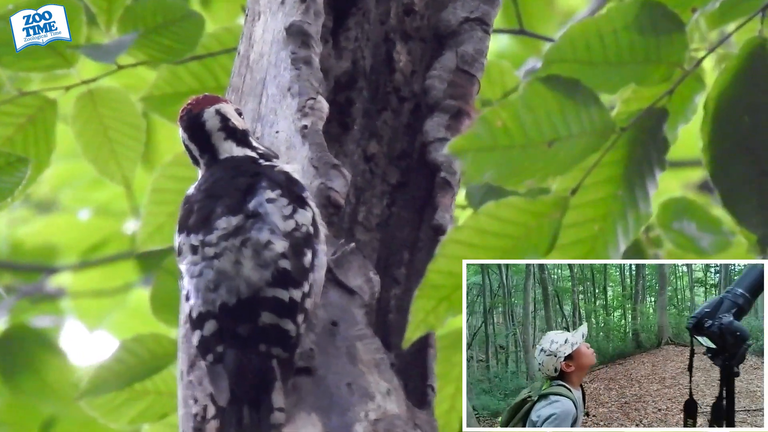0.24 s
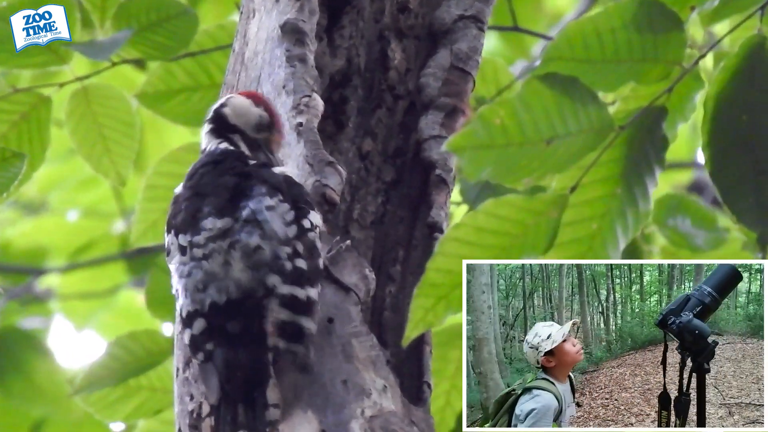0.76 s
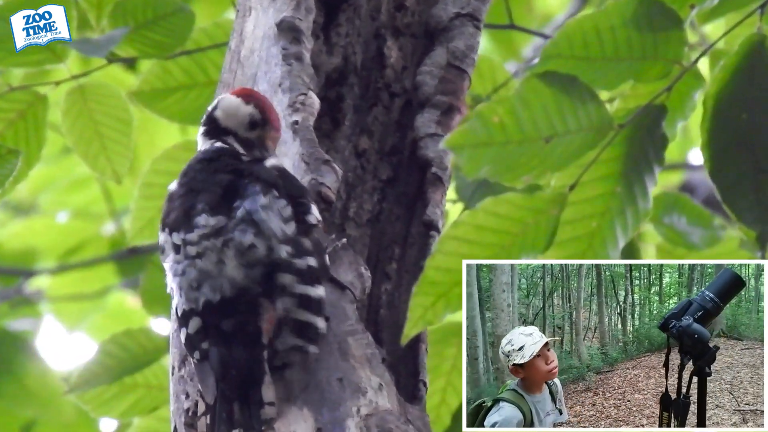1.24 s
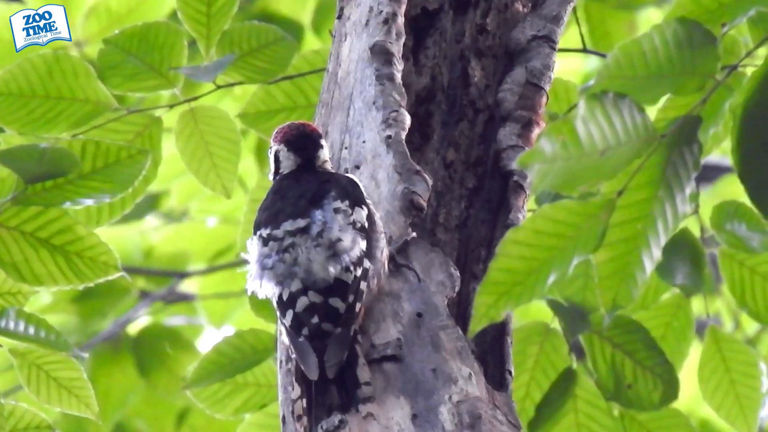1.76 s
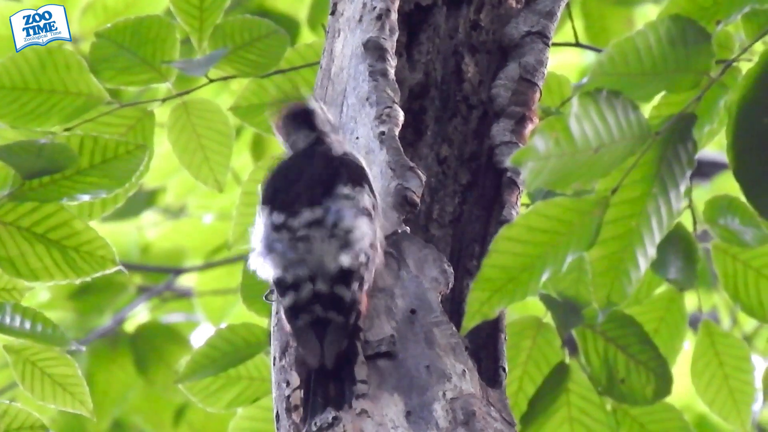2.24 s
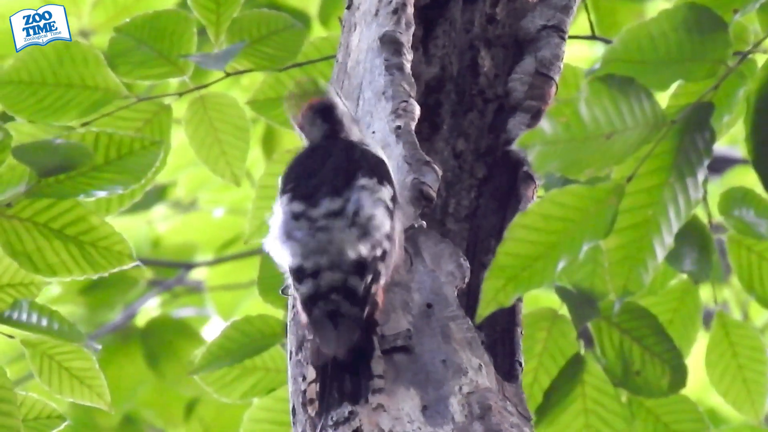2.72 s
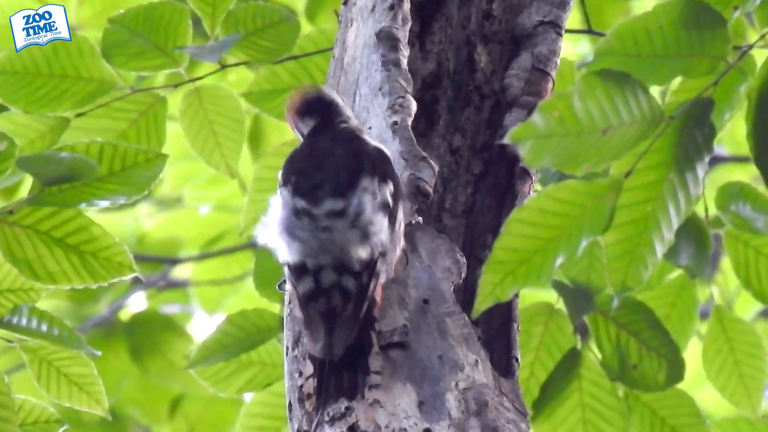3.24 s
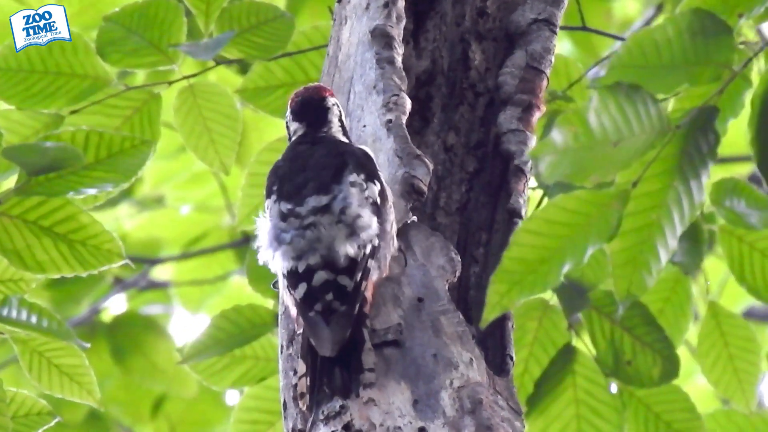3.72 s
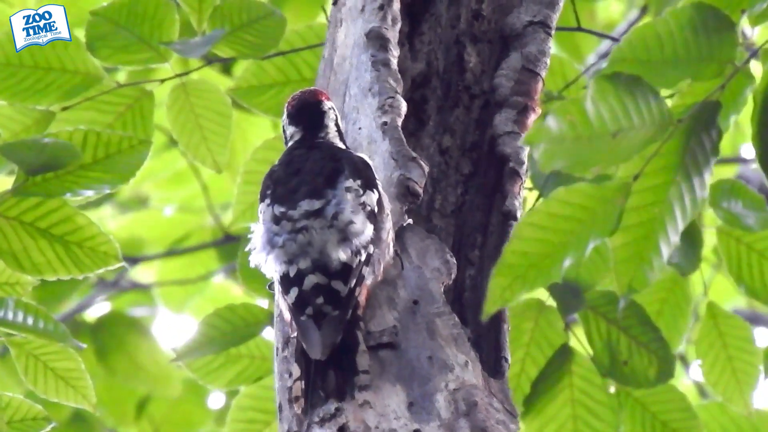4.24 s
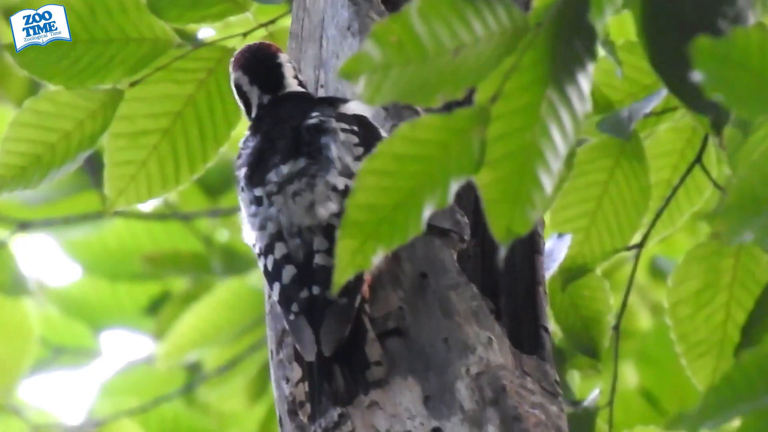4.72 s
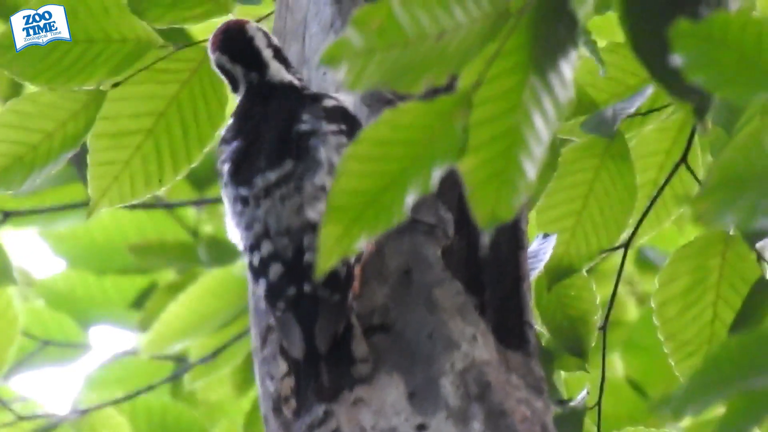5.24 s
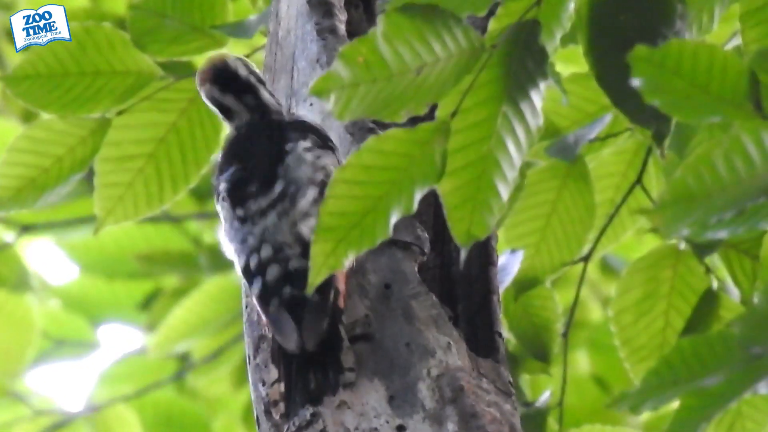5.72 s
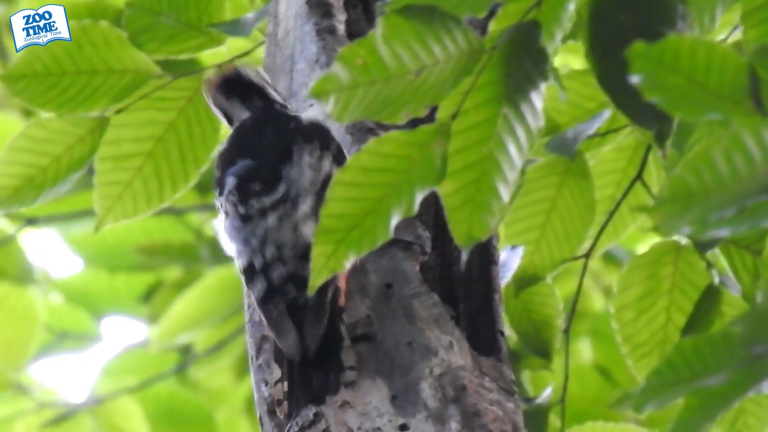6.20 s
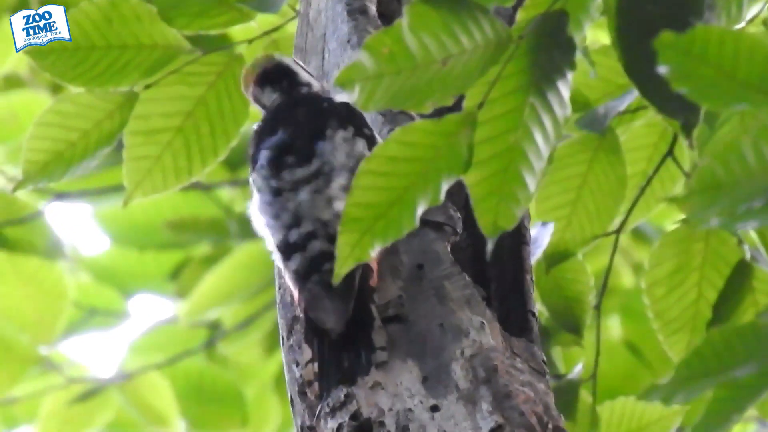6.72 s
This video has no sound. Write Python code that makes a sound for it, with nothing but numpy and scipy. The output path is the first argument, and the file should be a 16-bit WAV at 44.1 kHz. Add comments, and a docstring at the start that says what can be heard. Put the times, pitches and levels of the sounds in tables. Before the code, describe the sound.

A woodpecker drums two accelerating rolls on a dead trunk over a loud, high cicada chorus in a summer forest.

```python
"""A summer forest, in stereo. A woodpecker drums two rolls on a dead trunk: its bill rings the wood,
and each roll speeds up and fades among the trees. Three shots are cut together: a quiet one with distant
cicadas and light wind on the microphone, then two with a loud chorus, each opening on one near cicada
clicking its ribs into a buzz. Dull bumps, scuffs and ticks sound close to the microphone; a thin insect
whine and one falling whistle come from far off."""
import sys
import numpy as np
from scipy import signal
from scipy.fft import rfft, irfft, next_fast_len
from scipy.io import wavfile
from scipy.ndimage import map_coordinates

SR = 44100
rng = np.random.default_rng(int(sys.argv[2]) if len(sys.argv) > 2 else 0)


def unload_wav(signal):
    """Save mono or channel-first audio to the path in sys.argv[1] as 16-bit WAV at rate SR, clipped to [-1, 1]."""
    wavfile.write(
        sys.argv[1],
        SR,
        np.round(np.clip(np.atleast_2d(signal).T, -1, 1) * 32767).astype(np.int16),
    )


N = 306803
TIME_S = np.arange(N) / SR


def woodpecker(roll, level_db, fade_db, fade_power, scatter_db, soft_hz=1700, soft_db=-11):
    """One drum roll: the bill hits the same spot again and again, and weak blows are duller."""
    hard, soft = np.zeros((2, N))
    for start_s, db in strikes(roll, fade_db, fade_power):
        softness = min(1, amp(soft_db - db))
        hard[round(start_s * SR)] = amp(db) * (1 - softness)
        soft[round(start_s * SR)] = amp(db) * softness
    force = hard + filtered(soft, lambda hz: lowpass(hz, soft_hz, power=4))
    wood = amp(level_db) * signal.fftconvolve(force, trunk_knock(spot=roll))[:N]
    return trunk_to_microphone(wood, scatter_db)


# The two rolls: start_s, first_gap_s, shortening_per_gap_s, strike_count
ROLL_TIMING = [(2.0526, .0978, .002517, 25), (5.3847, .09866, .002453, 22)]

def strikes(roll, fade_db, fade_power, fastest_gap_s=.0501):
    """Time and level of each blow: gaps shrink towards the neck's limit, blows weaken ever faster."""
    start_s, first_gap_s, shortening_s, count = ROLL_TIMING[roll]
    k = np.arange(count)
    gaps = np.maximum(first_gap_s - shortening_s * k, fastest_gap_s)
    db = -fade_db * (k / k[-1]) ** fade_power
    db += rng.standard_normal(count)  # no two blows are quite alike
    db[0] -= 2.5  # a lighter opening blow
    return zip(start_s + np.cumsum(gaps) - gaps, db)


# Colour of a blow on the two drumming spots: frequency_hz, upper_spot_db, lower_spot_db
KNOCK_SPECTRA = [(61, -60.5, -66.5), (166, -15.5, -17), (297, -18, -15.5), (412, -5.5, -7),
                 (985, -2.5, -2.5), (1210, -4.5, -3.5), (1710, -3.5, 1.5), (2160, -7.5, -7),
                 (2400, -16.5, -12), (3600, -14.5, -19), (5900, -46, -55), (11700, -90.5, -85)]
# Resonances of the dead trunk, with one dip among them: centre_hz, width_hz, lift_db
TRUNK_RESONANCES = [(200, 64, 6), (346, 23, 17), (516, 35.5, 8.5), (668, 86, -2.5), (790.6, 45, 9.5),
                    (869, 46, 5), (1099, 77, 9.5), (1466, 270, 4), (1643, 160, 3.5), (1787, 52, 3.5),
                    (2310, 76, 5), (2800, 36, 7.5)]

def trunk_knock(spot, contact_hz=2300):
    """One strike of the bill: a short knock that rings the trunk, peak 1."""
    hz = np.fft.rfftfreq(SR // 2, 1 / SR)
    colour = amp(along(np.asarray(KNOCK_SPECTRA)[:, [0, spot + 1]], hz))
    contact = lowpass(hz, contact_hz, power=4)  # a smooth, brief contact rounds the knock
    delay = np.exp(-2j * np.pi * hz * .002)  # 2 ms, so its rise fits in the buffer
    response = contact * delay * minimum_phase(colour / contact)
    for centre, width, db in TRUNK_RESONANCES:
        resonance = 1j * hz * width / (centre ** 2 - hz ** 2 + 1j * hz * width)
        response *= 1 + (amp(db) - 1) * resonance
    wave = irfft(response)
    return -wave / np.abs(wave).max()


# Down the trunk, straight, off the ground, off a neighbouring tree: delay_s, level_db, cutoff_hz
KNOCK_PATHS = [(-.0033, -15.5, 1125), (0, -1, 3460), (.0063, -12, 4000), (.0145, -8.5, 825)]

def trunk_to_microphone(wood, scatter_db, deep_db=-9, side_db=-15.5):
    """Knocks arrive by four paths, with scatter off the trees and a faint echo from deeper woods."""
    def paths(hz):
        return sum(amp(db) * np.exp(-2j * np.pi * hz * delay_s) * lowpass(hz, cutoff_hz)
                   for delay_s, db, cutoff_hz in KNOCK_PATHS)
    tail = amp(scatter_db) * forest_tail(stretch=0.59) + amp(deep_db) * forest_tail(stretch=4.4)
    tail_s = np.arange(tail.shape[1]) / SR
    tail *= 1 - np.exp(-(tail_s / 0.0034) ** 2)  # scatter builds over the first milliseconds
    mid, side = signal.fftconvolve(wood[None], tail, axes=1)[:, :N]
    return filtered(wood, paths) + mid + amp(side_db) * np.array([side, -side])


# Scatter among the trunks, before stretching: frequency_hz, t60_s
FOREST_DECAY = [(200, 0.14), (500, 0.35), (1500, 0.15), (3000, 0.57), (7000, 0.19)]

def forest_tail(stretch):
    """Two unrelated tails of sound scattered by trees, each of energy about 1."""
    hz, t, noise = signal.stft(rng.standard_normal((2, SR)), SR, nperseg=256)
    t60_s = stretch * along(FOREST_DECAY, hz)[:, None]
    tail = signal.istft(noise * amp(-60 * t / t60_s), SR, nperseg=256)[1]
    return tail / np.linalg.norm(tail[0])


# Each near cicada sings a loud phrase, then a soft one: start_s, end_s, level_db, attack_s, release_s
FIRST_CICADA_PHRASES = [(1.62, 1.75, -23, 0.0036, 0.047), (1.75, 2.4, -29, .05, 0.33)]
SECOND_CICADA_PHRASES = [(4.66, 5.31, -14.5, 0.0074, 0.13), (5.55, 6.7, -26, 0.22, 0.24)]
# Their colour at the microphone: frequency_hz, level_db
FIRST_CICADA_SPECTRUM = [(4500, -53), (5200, -6), (5500, -0.5), (5800, 4), (6400, 0), (7000, 15.5),
                         (7700, -31), (10000, -54)]
SECOND_CICADA_SPECTRUM = [(4200, -59), (5100, -37), (5450, -21), (5680, -17), (5950, -8), (6350, 1),
                          (7050, 0), (7600, -6.5), (8300, -13), (10000, -57.5)]

def near_cicadas():
    """One cicada buzzes near the microphone in each loud shot; the second flutters slightly."""
    first = spread(tymbal(click_hz=582, jitter=.022), FIRST_CICADA_SPECTRUM)
    second = spread(tymbal(click_hz=540, jitter=.022), SECOND_CICADA_SPECTRUM)
    first *= phrases(FIRST_CICADA_PHRASES)
    second *= phrases(SECOND_CICADA_PHRASES) * amp(0.56 * wobble(30))
    return shot(1) * first + shot(2) * second


def tymbal(click_hz, jitter):
    """A cicada's ribs click at a slightly unsteady rate; the leaves smear the clicks."""
    cycles = np.cumsum(click_hz * (1 + jitter * wobble(180) + .003 * wobble(4))) / SR
    position = np.interp(np.arange(1, int(cycles[-1])), cycles, np.arange(N))
    sample, fraction = position.astype(int), position % 1
    size = amp(2 * rng.standard_normal(len(position)))
    clicks = np.bincount(sample, size * (1 - fraction), N + 1)
    clicks += np.bincount(sample + 1, size * fraction, N + 1)
    bright = filtered(clicks[:N], lambda hz: hz > 4500)  # so small a body radiates nothing low
    return irfft(rfft(bright, N) * rfft(forest_tail(stretch=0.36), N), N)


# The chorus far off, at middle distance and nearby: frequency_hz, level_db
FAR_CHORUS_SPECTRUM = [(2820, -56), (4800, -78), (5450, -7), (5990, -11.5), (6260, 0.5), (6780, -5.5),
                       (7350, -2), (8070, 7.5), (9110, 2.5), (9970, -3), (10700, -11.5), (13900, -76),
                       (22000, -120)]
MID_CHORUS_SPECTRUM = [(2710, -30.5), (4600, -31), (5080, -29.5), (6500, -6.5), (7840, 0.5), (8390, -2.5),
                       (8840, -7), (10700, -40.5), (13900, -97), (22000, -120)]
NEAR_CHORUS_SPECTRUM = [(2710, -20.5), (4600, -23.5), (5370, -26.5), (6210, -4.5), (6620, 1.5), (7380, 3.5),
                        (9130, -8.5), (10400, -28), (10700, -50), (13900, -61), (22000, -120)]

def cicadas(loud_top_hz=10858):
    """A steady chorus in each shot, with the two near singers on top."""
    far = shot(0) * chorus(FAR_CHORUS_SPECTRUM, level_db=-43.5, leader_db=-1, click_hz=582)
    mid = shot(1) * chorus(MID_CHORUS_SPECTRUM, level_db=-21, leader_db=-6.5, click_hz=505)
    near = shot(2) * chorus(NEAR_CHORUS_SPECTRUM, level_db=-19.5, leader_db=0, click_hz=474)
    return far + filtered(mid + near + near_cicadas(), lambda hz: hz < loud_top_hz)


def chorus(spectrum, level_db, leader_db, click_hz):
    """Countless cicadas merge into a hiss, with one leader standing a little out of it."""
    voices = rng.standard_normal((2, N)) + amp(leader_db) * unit(tymbal(click_hz, jitter=.016))
    return amp(level_db + 0.48 * wobble(4) + 0.16 * wobble(25)) * spread(voices, spectrum)


# Dull bumps: peak_s, pitch_hz, level_db, half_width_s
DULL_BUMPS = [(4.206, 215, -38, 0.019), (5.278, 200, -28.5, 0.016), (5.329, 196, -17, 0.012),
              (5.365, 184, -31.5, 0.027), (5.701, 170, -16.5, 0.0057), (5.728, 171, -34, 0.011)]
# Small taps and leaf ticks: peak_s, centre_hz, level_db, half_width_s
LEAF_TICKS = [(0.263, 900, -54, .005), (0.333, 1030, -50, 0.0037), (0.638, 520, -47, 0.0023),
              (1.092, 470, -46.5, .005), (1.133, 845, -51.5, 0.0034), (2.307, 4800, -33, 0.011),
              (5.468, 4470, -33.5, 0.0062), (5.704, 2560, -26.5, 0.0081), (5.721, 4800, -27, .006)]
# Soft scuffs leading into the second roll: peak_s, level_db, half_width_s
SOFT_SCUFFS = [(4.83, -41.5, 0.034), (5.075, -39, 0.02), (5.274, -31.5, 0.0065), (5.315, -37, 0.014),
               (5.387, -31, 0.062)]
# Their colour: frequency_hz, level_db
SCUFF_SPECTRUM = [(100, -24), (400, -26), (600, 7), (750, -3), (870, 8), (1000, 4), (1500, -15),
                  (4000, -8.5), (9000, -57)]

def close_noises():
    """Low bumps, small ticks and soft scuffs close to the microphone."""
    bumps = sum(amp(db) * swell(s, width) * np.sin(2 * np.pi * hz * (TIME_S - s))
                for s, hz, db, width in DULL_BUMPS)
    ticks = sum(amp(db) * swell(s, width) * noise_band(hz) for s, hz, db, width in LEAF_TICKS)
    scuff_gain = sum(amp(db) * swell(s, width) for s, db, width in SOFT_SCUFFS)
    return bumps + ticks + scuff_gain * stereo_noise(SCUFF_SPECTRUM)


# The distant insect's song: start_s, end_s, level_db, attack_s, release_s
INSECT_PHRASES = [(0, .38, -51.5, 0.007, 0.21), (1.63, 2.25, -36.5, 0.37, 1.5), (5.15, 5.35, -46, .1, .6)]
# Its note in each shot: pitch_hz
INSECT_PITCHES = [4050, 4175, 4220]

def distant_insect(octave_db=-6, flutter_db=2):
    """A thin whine that pulses unevenly, with a weaker partial an octave below."""
    pitch_hz = sum(hz * shot(k) for k, hz in enumerate(INSECT_PITCHES))
    whine = far_tone(pitch_hz, blur_hz=81) + amp(octave_db) * far_tone(pitch_hz / 2, blur_hz=70)
    return whine * phrases(INSECT_PHRASES) * amp(flutter_db * wobble(14))


def distant_whistle(peak_s=2.7, level_db=-39, pitch_hz=3940, fall_hz_per_s=1000):
    """One faint whistle swells and falls in pitch, far from the microphone."""
    glide_hz = pitch_hz - fall_hz_per_s * (TIME_S - peak_s)
    return amp(level_db) * swell(peak_s, half_width_s=0.22) * far_tone(glide_hz, blur_hz=200)


def far_tone(pitch_hz, blur_hz):
    """A far tone, blurred by its many paths through the trees."""
    phase = 2 * np.pi * np.cumsum(pitch_hz) / SR
    blur = filtered(rng.standard_normal((2, 2, N)), lambda hz: lowpass(hz, blur_hz))
    return unit(blur[0] * np.cos(phase) + blur[1] * np.sin(phase))


# Wind rumble on the microphone: frequency_hz, level_db
WIND_SPECTRUM = [(15, -14), (30, 5.5), (55, 1), (100, -2), (160, -15), (260, -23.5), (600, -68)]

def microphone_wind(breeze_db=-47, fall_db_per_s=4, puff_db=-41.5):
    """Light wind buffets the microphone in the first shot, easing off but for one stronger puff."""
    breeze = amp(breeze_db - fall_db_per_s * TIME_S)
    puff = amp(puff_db) * swell(peak_s=1.33, half_width_s=0.061)
    return shot(0) * (breeze + puff) * amp(1.3 * wobble(8.9)) * stereo_noise(WIND_SPECTRUM)


# Hush of the quiet shot and forest air of the loud ones: frequency_hz, level_db
HUSH_SPECTRUM = [(80, -5), (170, -1.5), (320, -6), (550, -15.5), (1500, -18), (2100, -15.5), (3000, -22.5),
                 (5000, -21), (12000, -24.5), (15500, -25)]
AIR_SPECTRUM = [(25, -10.5), (60, 4), (130, 3.5), (220, -2.5), (350, -13), (700, -11), (1500, -19.5),
                (3000, -19.5), (5000, -11), (9000, -22), (11000, -95)]
# The background in each shot: opening_level_db, fall_db_per_s
AIR_LEVELS = [(-47.5, 6), (-44, 0.4), (-38, 2.2)]

def forest_air():
    """The soft noise of the forest all round, easing off through each shot."""
    gain = sum(shot(k) * amp(db - fall * (TIME_S - SHOT_EDGES[k]))
               for k, (db, fall) in enumerate(AIR_LEVELS))
    hush = amp(wobble(30)) * stereo_noise(HUSH_SPECTRUM)
    return gain * np.where(shot(0), hush, stereo_noise(AIR_SPECTRUM))


# Where the three shots begin and end: time_s
SHOT_EDGES = [0, 1.632, 4.668, 7]

def shot(index):
    """1 while this shot runs, else 0."""
    return (TIME_S >= SHOT_EDGES[index]) & (TIME_S < SHOT_EDGES[index + 1])


# Stereo width at the microphone: frequency_hz, side_minus_mid_db
STEREO_WIDTH = [(60, -8), (140, -9), (330, -4), (780, -7), (1850, -15), (4350, -7.5), (10200, -0.5)]

def spread(pair, spectrum):
    """Two unrelated signals become one coloured stereo sound whose mid has rms 1."""
    mid = filtered(pair[0], lambda hz: amp(along(spectrum, hz)))
    side = filtered(pair[1], lambda hz: amp(along(spectrum, hz) + along(STEREO_WIDTH, hz)))
    return np.array([mid + side, mid - side]) / np.std(mid)


def stereo_noise(spectrum):
    """Coloured stereo noise."""
    return spread(rng.standard_normal((2, N)), spectrum)


def noise_band(centre_hz, log_width=0.21):
    """Noise around one frequency, rms 1."""
    noise = rng.standard_normal(N)
    return unit(filtered(noise, lambda hz: 1 / (1 + (np.log((hz + 1) / centre_hz) / log_width) ** 2)))


def phrases(rows):
    """Gain of an insect's song: each phrase rises, holds and dies away."""
    gain = np.zeros(N)
    for start_s, end_s, db, attack_s, release_s in rows:
        rise = 1 - np.exp(-np.maximum(TIME_S - start_s, 0) / attack_s)
        fall = np.exp(-np.maximum(TIME_S - end_s, 0) / release_s)
        gain += amp(db) * rise * fall
    return gain


def swell(peak_s, half_width_s):
    """A smooth rise and fall, peak 1."""
    return np.exp(-((TIME_S - peak_s) / half_width_s) ** 2)


def wobble(rate):
    """A smooth random curve, rate knots a second."""
    return map_coordinates(rng.standard_normal(int(N * rate / SR) + 4), [TIME_S * rate], order=2)


def filtered(x, response):
    """x times a response of frequency."""
    size = next_fast_len(N + SR // 2)
    return irfft(rfft(x, size) * response(np.fft.rfftfreq(size, 1 / SR)), size)[..., :N]


def lowpass(hz, cutoff_hz, power=2):
    """Gain that falls away above the cutoff."""
    return 1 / (1 + (hz / cutoff_hz) ** power)


def minimum_phase(gain):
    """The causal response with this gain."""
    cepstrum = irfft(np.log(np.maximum(gain, 1e-6)))
    half = len(cepstrum) // 2
    return np.exp(rfft(np.r_[cepstrum[0], 2 * cepstrum[1:half], np.zeros(half)]))


def along(points, hz):
    """Interpolate (frequency_hz, value) points on a log axis."""
    knots_hz, values = np.transpose(points)
    return np.interp(np.log(hz + 1), np.log(knots_hz + 1), values)


def amp(db):
    """Decibels to gain."""
    return 10 ** (np.asarray(db) / 20)


def unit(x):
    """Scale to rms 1."""
    return x / np.sqrt(np.mean(x ** 2) + 1e-20)


def scene():
    """The forest at the microphone: the quiet shot sits slightly right, the loud ones slightly left."""
    drumming = woodpecker(roll=0, level_db=0.5, fade_db=15.5, fade_power=3.16, scatter_db=-3.5)
    drumming += woodpecker(roll=1, level_db=2.0, fade_db=12.5, fade_power=3.7, scatter_db=-4.0)
    forest = drumming + cicadas() + distant_insect() + distant_whistle()
    forest += close_noises() + microphone_wind() + forest_air()
    left_db = -.4 * shot(0) + 0.53 * shot(1) + 0.52 * shot(2)
    return forest * amp([left_db, -left_db])


def record(dry, top_hz=15800):
    """Peaks stop at full scale, and nothing is kept above the band limit."""
    return filtered(np.clip(dry, -1, 1), lambda hz: hz < top_hz)


dry = scene()
out = record(dry)
unload_wav(out)
```